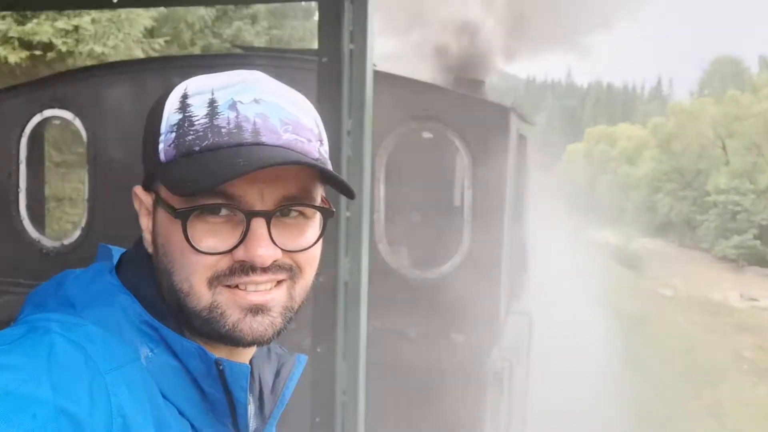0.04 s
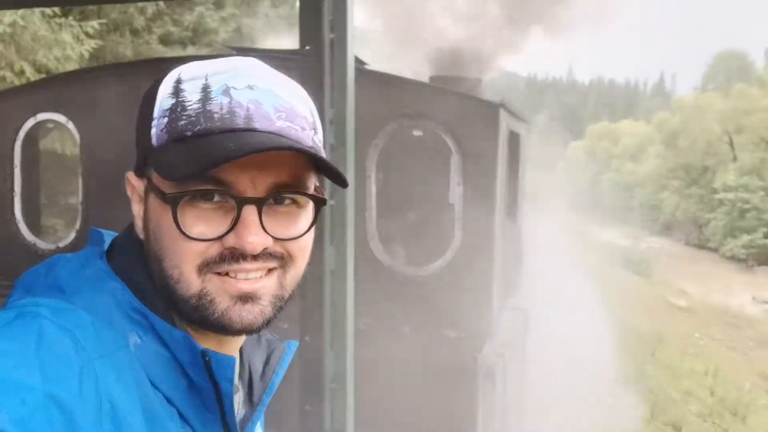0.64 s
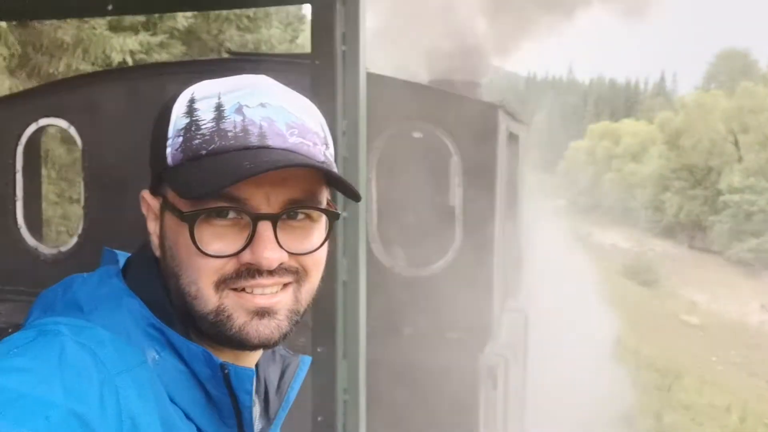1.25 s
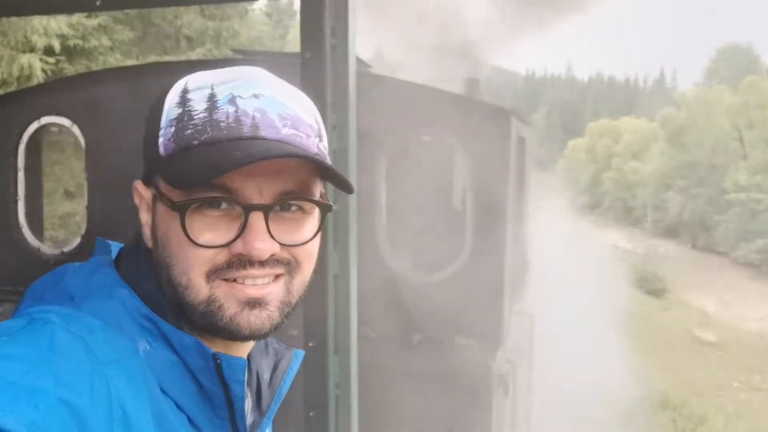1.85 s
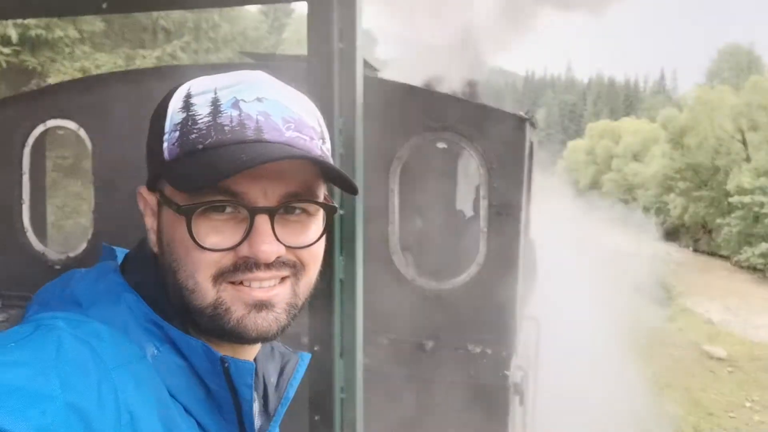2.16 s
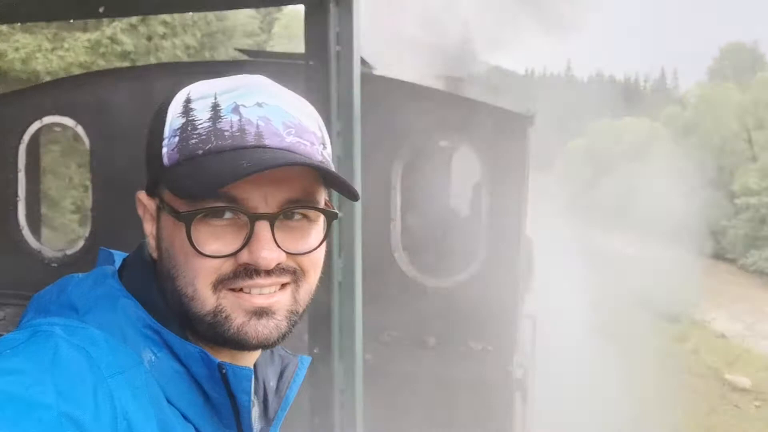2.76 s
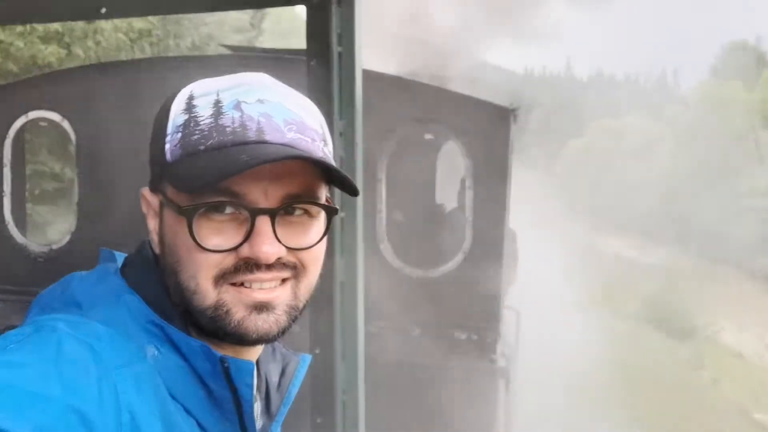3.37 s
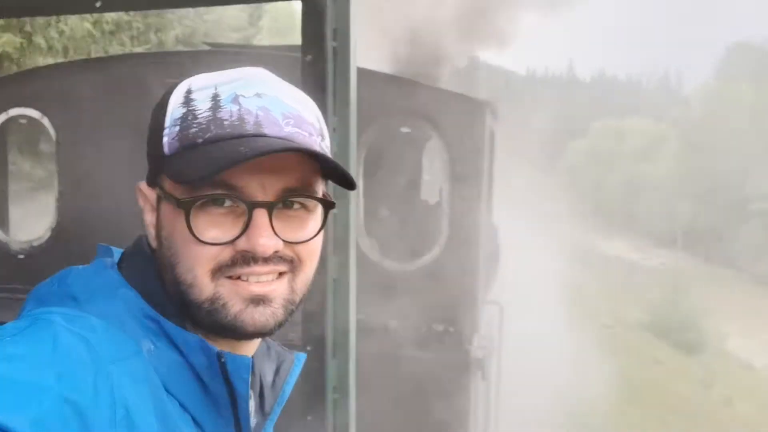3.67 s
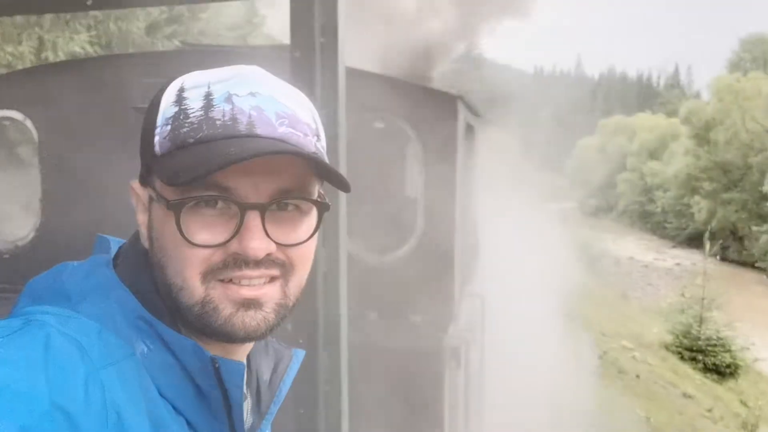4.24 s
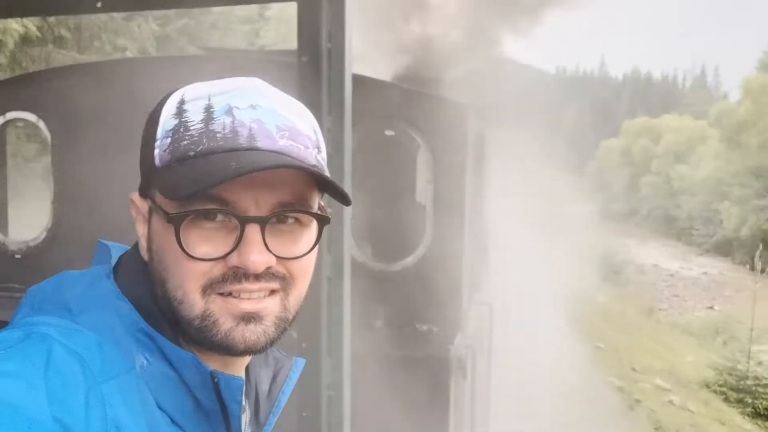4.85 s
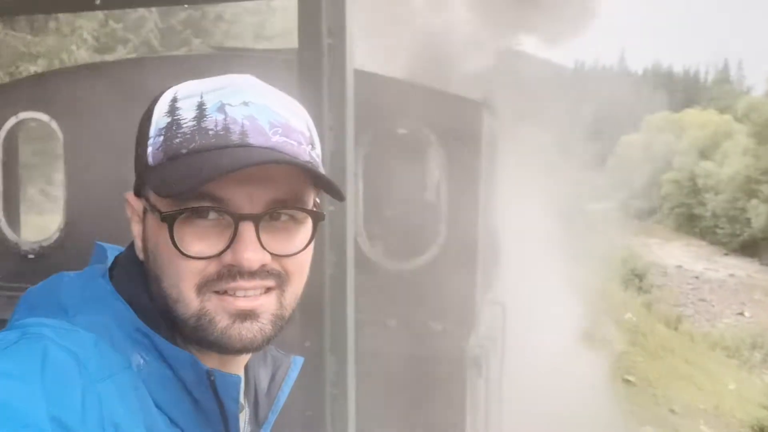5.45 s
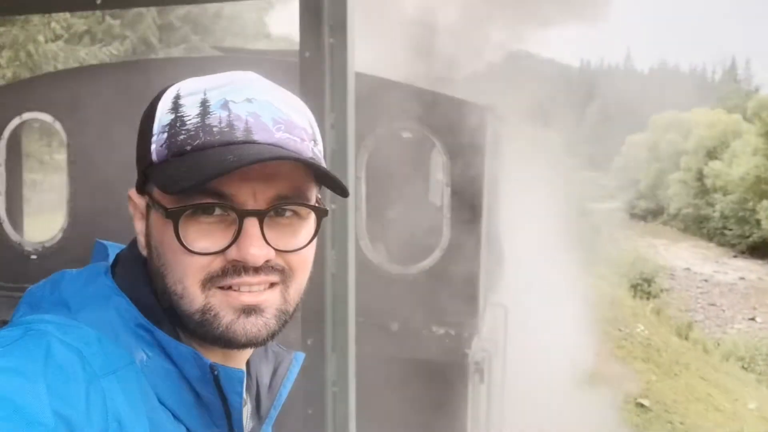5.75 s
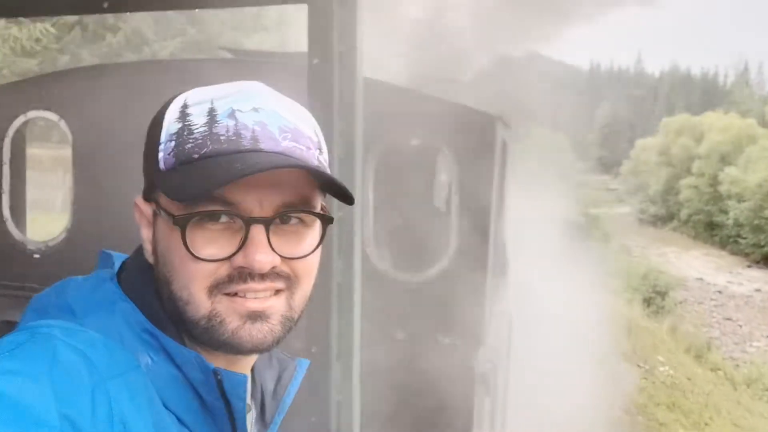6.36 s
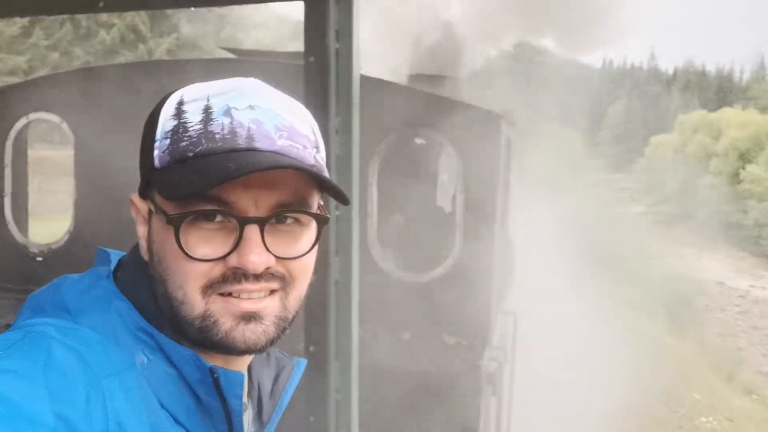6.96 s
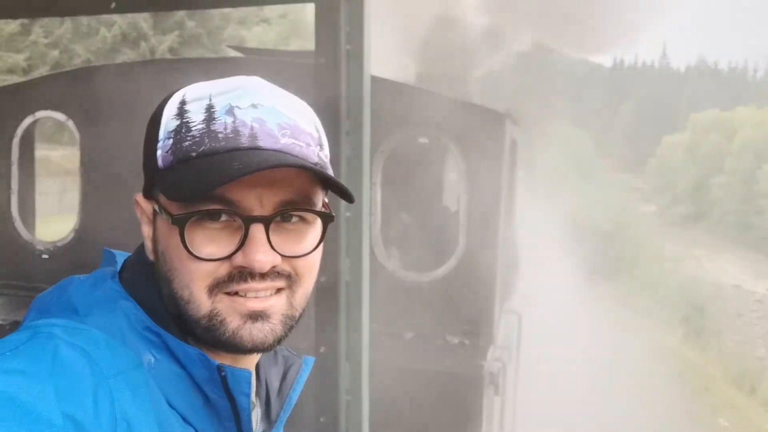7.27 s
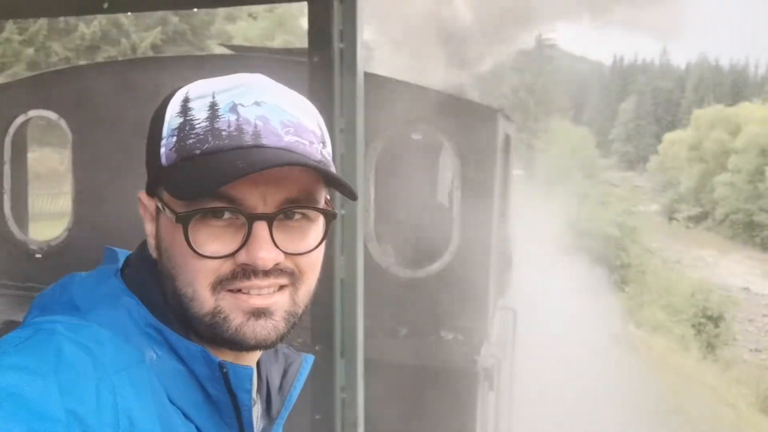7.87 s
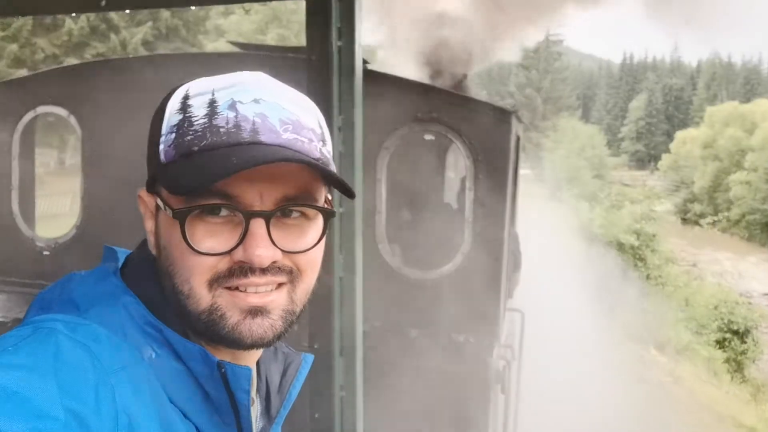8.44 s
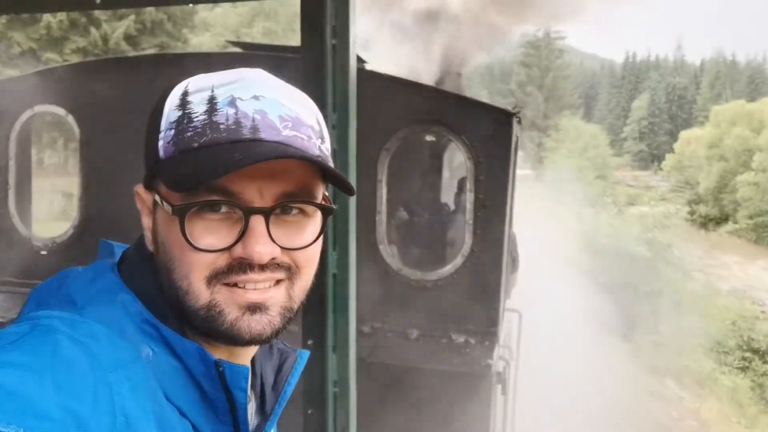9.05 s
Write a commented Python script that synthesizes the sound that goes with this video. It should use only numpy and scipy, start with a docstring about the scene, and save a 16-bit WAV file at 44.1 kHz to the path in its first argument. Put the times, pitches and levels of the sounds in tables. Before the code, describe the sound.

A small steam locomotive chuffs quickly and steadily close by, with hissing steam over the low rumble of wheels on rails.

```python
"""In an open carriage just behind the cab, as a small steam locomotive works along a valley.
Steam puffs from the chimney five and a half times a second. Each puff, or beat, roars, hisses
and makes the hollow cab boom. Underneath, the wheels rumble and ring on the rails,
a dull knock stands out now and then, and a little steam leaks all the time."""
import sys
import numpy as np
from scipy import signal
from scipy.fft import rfft, irfft, next_fast_len
from scipy.io import wavfile
from scipy.ndimage import uniform_filter1d

SR = 44100
rng = np.random.default_rng(int(sys.argv[2]) if len(sys.argv) > 2 else 0)


def generate_wav(signal):
    """Clip the signal to [-1, 1] and save it as 16-bit WAV at the path in sys.argv[1]."""
    frames = np.transpose(np.atleast_2d(signal))
    scaled = np.clip(frames, -1, 1) * 32767
    pcm = np.round(scaled).astype(np.int16)
    wavfile.write(sys.argv[1], SR, pcm)


N = 406161
TIME = np.arange(N) / SR
SIZE = next_fast_len(N, True)
HZ = np.fft.rfftfreq(SIZE, 1 / SR)

# How hard the engine works. Each row: time in seconds, effort in dB.
ENGINE_EFFORT = [(0.0, -2.3), (0.83, 0.15), (2.46, -3.5), (3.01, 0.6), (3.56, -1.5), (5.02, -0.3),
                 (5.38, 1), (5.57, 0.5), (6.12, 1), (8.51, 0.5), (8.88, 3), (9.21, 0.4)]


def gain_of(db):
    """Turns decibels into a number to multiply a sound by."""
    return 10 ** (np.asarray(db) / 20)


def over_time(points, seconds=TIME):
    """Joins (seconds, value) points with straight lines."""
    return np.interp(seconds, *np.transpose(points))


def over_pitch(points):
    """Joins (Hz, value) points with straight lines, on a scale of octaves."""
    hz, value = np.transpose(points)
    return np.interp(np.log(HZ + 1), np.log(hz + 1), value)


def tone(points):
    """The gain at each frequency, from (Hz, dB) points."""
    return gain_of(over_pitch(points))


def resonances(modes):
    """The gain at each frequency of something that rings at a few pitches."""
    return np.sqrt(sum(gain_of(db) ** 2 / (1 + ((HZ - hz) / width) ** 2) ** 3 for hz, width, db in modes))


def drift(rate_hz):
    """A random wobble, about 1 in size, that changes up to about the given rate."""
    size = 2 ** 14
    hz = np.fft.rfftfreq(size, TIME[-1] / size)
    wave = irfft(rfft(rng.standard_normal(size)) * np.exp(-(hz / rate_hz) ** 2), size)
    return np.interp(TIME, np.linspace(0, TIME[-1], size), wave / wave.std())


def swells(events):
    """One smooth rise and fall for each (middle in seconds, length in seconds, dB)."""
    return sum(gain_of(db) * np.exp(-np.square(2 * (TIME - s) / length)) for s, length, db in events)


def stereo_noise(shape):
    """Noise with the given tone, as it reaches the left and right microphones."""
    # How alike the two sides are. Each row: frequency in Hz, likeness from 0 to 1.
    likeness = [(30, 0.96), (130, 0.96), (210, 0.86), (300, 0.93), (700, 1), (950, 0.6), (1700, 1),
                (3000, 0.73), (5000, 0.64), (6000, 0.35), (7200, 0.36), (8000, .12)]
    # How far the left side lags. Each row: frequency in Hz, lag in radians.
    left_lag = [(30, -0.5), (1000, 0.53), (1500, 0.74), (2400, 2), (3300, 3), (4500, 3.5), (5500, 4.5),
                (7000, 9), (16000, 15.5)]
    common, own = rng.standard_normal((2, len(HZ))) + 1j * rng.standard_normal((2, len(HZ)))
    same = np.clip(over_pitch(likeness), 0, 1)
    left = common * np.exp(-1j * over_pitch(left_lag))
    right = same * common + np.sqrt(1 - same ** 2) * own
    return irfft(np.array([left, right]) * shape * np.sqrt(SIZE * SR) / 2, SIZE)[:, :N]


def steadied(sound, seconds, share):
    """Evens out the level: something kept ringing is steadier than plain noise."""
    power = uniform_filter1d((sound ** 2).mean(0), int(seconds * SR))
    power = uniform_filter1d(power, int(seconds * SR) // 2)
    return sound * (power.mean() / power) ** (share / 2)


def wall_echoes(sound, sway=0.0223):
    """Nearby walls add echoes whose delays shift as the carriage sways."""
    # Echoes off the cab and the roof. Each row: delay in seconds, strength as a fraction.
    echoes = [(.00198, 0.14), (.0043, 0.13), (.0071, .13), (.0116, 0.21)]
    out = sound.copy()
    for delay, strength in echoes:
        earlier = TIME - delay * (1 + sway * drift(0.9))
        out += strength * np.array([np.interp(earlier, TIME, side) for side in sound])
    return out


def engine_beats(count=51, first_s=.0322, gap_s=.181064, slowing_s=.0000746):
    """Four valves take turns, slowing very slightly. Gives each beat's start, strength and fade time."""
    # The uneven beats of one wheel turn. Each row: lateness in seconds, strength in dB, fade in seconds.
    valves = [(0.0048, 6.5, .17), (-0.00082, 7, 0.15), (-0.008, 7, 0.12), (0.0072, 9, 0.095)]
    k = np.arange(count)
    late, db, fade = np.array(valves)[k % len(valves)].T
    louder, longer = rng.uniform(-1, 1, (count, 2)).T
    start = first_s + gap_s * k + slowing_s * k * (k - 1) / 2 + late
    return np.transpose([start, db + .5 * louder, fade * np.exp(0.16 * longer)])


def puffing(beats, curve, follow, open_s, close_s, leak_db, leak_follow=0, accent=1):
    """Steam flow swells as a valve opens and fades as the cylinder empties; some leaks in between."""
    # follow and leak_follow set how much the beats and the leak respond to the level curve
    power = gain_of(leak_db + leak_follow * over_time(curve)) ** 2
    for start, strength_db, fade in beats:
        curve_db = over_time(curve, start + .07)  # at the middle of the beat
        span = slice(max(int(start * SR), 0), int(start * SR) + SR // 2)
        t = np.maximum(TIME[span] - start, 0)
        valve = np.sin(np.pi / 2 * np.minimum(t / open_s, 1)) / (1 + (t / close_s) ** 4)
        emptying = np.exp(-t / (fade * np.exp(0.15 * curve_db)))  # harder beats fade more slowly
        power[span] += (gain_of(accent * strength_db + follow * curve_db) * valve * emptying) ** 2
    return np.sqrt(power)


def leaking_steam(waver_db=1.2):
    """Steam leaks by the cylinders with a thin, steady hiss."""
    # The band of hiss. Each row: pitch in Hz, width in Hz, level in dB.
    leak_band = [(4000, 1200, -70.5)]
    return stereo_noise(resonances(leak_band)) * gain_of(waver_db * drift(3))


def dull_knocks(pitch_hz=385, rise_s=0.0067):
    """Short, dull knocks stand out from the boom now and then."""
    # The knocks. Each row: start in seconds, relative level in dB.
    knocks = [(0.574, -14), (1.752, -7), (2.982, -7), (3.519, -7), (3.728, -9.5), (3.966, -10),
              (4.276, -6.5), (5.405, -11), (5.562, -7), (6.695, -4), (7.408, -1.5), (7.527, -9.5),
              (7.623, -7.5), (8.362, -7.5), (8.479, -6.5), (8.754, -8.5), (9.184, -7)]
    out, t = np.zeros(N), TIME[:SR // 10]
    blow = (t / rise_s * np.exp(1 - t / rise_s)) ** 2
    for (start, db), (detune, phase) in zip(knocks, rng.uniform(-0.78, 1, (len(knocks), 2))):
        note = np.sin(2 * np.pi * pitch_hz * (1 + 0.038 * detune) * t + np.pi * phase)
        knock = gain_of(db - 2) * blow * note
        part = out[round(start * SR):][:len(t)]
        part += knock[:len(part)]
    return out


def track_rumble(jolt_s=0.048):
    """Rolling shakes the carriage; uneven track jolts only the deepest part of the rumble."""
    # The tone of wheels on track. Each row: frequency in Hz, level in dB.
    rumble = [(10, -75), (22, -71), (35, -61), (48, -48.5), (57, -46), (75, -46), (100, -50.5),
              (150, -54.5), (200, -53.5), (330, -48.5), (520, -60), (800, -65.5), (1500, -74), (4000, -94)]
    # Bumps in the track. Each row: time in seconds, relative strength in dB.
    jolts = [(1.31, 10), (1.80, 5), (1.99, 7), (2.25, 3), (2.38, 14), (2.58, 4), (2.9, 6), (3.31, 8),
             (4.74, 5), (4.94, 10), (5.03, 7), (5.48, 5), (5.76, 2.5), (5.93, 6), (6.68, 8), (7.45, 7),
             (8.02, 9), (8.69, 2), (9.14, 3)]
    deep_share = 1 / (1 + (HZ / 85) ** 4)
    deep = steadied(stereo_noise(tone(rumble) * np.sqrt(deep_share)), seconds=0.11, share=.7)
    deep *= gain_of(-0.5 + drift(9)) + swells((s, jolt_s, db - 3) for s, db in jolts)
    return deep + stereo_noise(tone(rumble) * np.sqrt(1 - deep_share))


def floor_drone(pitch_hz=56, quiet_db=-44):
    """Rolling sets the carriage floor humming on a low, wavering note."""
    # Louder spells. Each row: middle in seconds, length in seconds, level in dB.
    spells = [(2.0, 0.67, -26), (3.35, 0.28, -30), (5.6, .5, -29)]
    cycles = np.cumsum(pitch_hz * (1 + 0.038 * drift(5.7))) / SR
    level = (gain_of(quiet_db) + swells(spells)) * gain_of(1.3 * drift(8))
    return np.sqrt(2) * np.sin(2 * np.pi * cycles) * level


def wheel_ring(beats):
    """The wheels rub and ring, more so as each piston stroke tugs them against the rail."""
    # The notes of the wheel discs. Each row: pitch in Hz, width in Hz, level in dB.
    wheel_notes = [(1089, 212, -51.5), (1200, 200, -54)]
    # Rubbing of the wheel rims. Each row: time in seconds, change in ringing in dB.
    rubbing = [(0, 1.5), (1.05, 1.5), (2.1, 5), (2.8, 0), (3.8, 5), (4.2, 2), (4.7, 4), (7.1, -3.5),
               (7.65, 1), (9.21, -8)]
    noise = rng.standard_normal((2, SIZE))
    ring = irfft(rfft(noise) * resonances(wheel_notes), SIZE)[:, :N] * np.sqrt(SR / 2)
    ring = 0.67 * ring + 0.24 * ring[::-1]  # it comes from all round, so each side hears mostly its own
    tug = puffing(beats, ENGINE_EFFORT, follow=0.24, open_s=0.094, close_s=0.22, leak_db=-16) ** 0.45
    return ring * tug * gain_of(over_time(rubbing) + 1.66 * drift(20))


def cab_boom(beats, swell_s=0.084):
    """The beats keep the air and sheet steel of the cab booming, each with a low thump."""
    # The cab's booming and thumping notes. Each row: pitch in Hz, width in Hz, level in dB.
    boom_notes = [(274, 14.6, -49.5), (349, 37, -42.5), (383.7, 22.5, -39.5), (411.8, 22.5, -43.5),
                  (461, 38, -53.5), (594, 54, -51.5)]
    thump_notes = [(117.7, 20.6, -38), (148, 30, -42.5)]
    # When the thump swells. Each row: time in seconds, added thump in dB relative to the usual one.
    louder_thumps = [(.26, -9), (1.01, -5), (1.92, -5), (2.28, -1), (3.51, 0), (3.74, -4), (4.27, -2),
                     (7.03, -8), (7.67, -7), (7.97, -6), (9.11, -9)]
    boom = steadied(stereo_noise(resonances(boom_notes)), seconds=0.092, share=0.96)
    boom *= gain_of(1.12 + drift(5.5))
    boom *= puffing(beats, ENGINE_EFFORT, follow=.11, open_s=0.091, close_s=0.23,
                    leak_db=-3, leak_follow=0.35, accent=0.55)
    thump = steadied(stereo_noise(resonances(thump_notes)), seconds=0.16, share=0.72) * gain_of(1.86)
    thump *= puffing(beats, ENGINE_EFFORT, follow=-0.33, open_s=0.091, close_s=.2,
                     leak_db=-4.5, accent=0.53)
    return boom + thump * (1 + swells((s, swell_s, db) for s, db in louder_thumps))


def chimney_hiss(beats, flutter):
    """The steam jet hisses with each beat; its smallest swirls add a fizz with a flicker of its own."""
    # The tone of the hiss. Each row: frequency in Hz, level in dB.
    hiss_tone = [(1000, -84), (2500, -72), (3500, -66), (4300, -65), (6000, -65), (9000, -71), (12000, -76),
                 (16000, -81)]
    # How all the hiss, and the fizz alone, rise and fall. Each row: time in seconds, level in dB.
    steam_level = [(0.0, 1.2), (0.46, -1), (0.83, 3), (1.19, -0.3), (2.64, -2), (2.83, -1.1), (4.29, -1.5),
                   (4.47, -0.4), (5.02, -0.4), (5.2, 1.7), (5.57, 1.5), (5.93, 3.5), (6.12, 0.2),
                   (6.48, 0.0), (7.04, 1.5), (7.96, 0.0), (8.14, 2), (9.21, 3.5)]
    fizz_level = [(0, 1), (.65, -1.5), (1.5, -1.2), (1.8, 1.5), (2.4, -3), (2.8, 3), (3.15, 0), (6.3, 0.6),
                  (7.35, -0.5), (7.6, 0.5), (9.21, -1.5)]
    # Spurts of steam. Each row: middle in seconds, length in seconds, level in dB relative to the hiss.
    spurts = [(.46, 0.083, -11), (.66, 0.11, -9), (1.38, 0.14, -8), (2.09, 0.074, -19), (2.28, .08, -13.5),
              (4.7, .2, -15), (7.19, 0.053, -14), (7.45, 0.22, -7.5), (8.14, 0.079, -7)]
    fizz_share = 1 / (1 + (7000 / (HZ + 1)) ** 8)
    hiss = stereo_noise(tone(hiss_tone) * np.sqrt(1 - fizz_share))
    hiss *= gain_of(-0.66 + .5 * flutter + 0.8 * drift(55)) * (1 + swells(spurts))
    hiss *= puffing(beats, steam_level, follow=.65, open_s=0.077, close_s=0.22,
                    leak_db=-7, leak_follow=0.61)
    fizz = stereo_noise(tone(hiss_tone) * np.sqrt(fizz_share))
    fizz *= gain_of(over_time(fizz_level) + .5 * flutter + 0.56 * drift(90))
    fizz *= puffing(beats, steam_level, follow=0.34, open_s=0.07, close_s=0.22,
                    leak_db=-7, leak_follow=0.47)
    return hiss, fizz


def chimney_roar(beats, flutter):
    """The steam jet roars with each beat, makes the pipe ring and barks when the engine works hard."""
    # The tone of the jet. Each row: frequency in Hz, level in dB.
    roar_tone = [(150, -76), (300, -60.5), (600, -59.5), (900, -61), (1300, -59), (1700, -56),
                 (2100, -56.5), (2700, -61), (3500, -67), (6000, -80), (16000, -105)]
    # The pipe's hollow notes and the bark. Each row: pitch in Hz, width in Hz, level in dB.
    pipe_notes = [(515, 69, -59), (629.5, 40, -52), (647, 25, -54), (754, 85, -59.5)]
    bark_notes = [(1660, 240, -58.5), (2060, 180, -65.5), (2720, 87, -62.5)]
    # How strongly the pipe rings. Each row: time in seconds, change in dB.
    ring_level = [(0, 11), (.55, -2.5), (2.1, -2.5), (3, -7), (3.6, -2), (5.4, -2), (5.8, 1.5), (6.9, 3),
                  (7.8, 1.5), (8.7, 3.5), (9.21, 3.5)]
    roar = stereo_noise(tone(roar_tone)) * gain_of(0.77 * flutter + 0.95 * drift(120))
    ring = stereo_noise(resonances(pipe_notes)) * gain_of(over_time(ring_level) + 1.2 * drift(7.1))
    bark = stereo_noise(resonances(bark_notes))
    bark *= gain_of(2.7 * over_time(ENGINE_EFFORT) + 2.3 * drift(7.3))
    flow = puffing(beats, ENGINE_EFFORT, follow=.2, open_s=0.071, close_s=0.19, leak_db=-5)
    return (roar + ring + bark) * flow


def scene():
    """The engine and the carriage together, sharing one set of beats."""
    beats = engine_beats()
    flutter = drift(53)  # the jet flutters as its swirls break up
    roar = chimney_roar(beats, flutter)
    hiss, fizz = chimney_hiss(beats, flutter)
    engine = wall_echoes(roar + hiss) + fizz + leaking_steam() + cab_boom(beats)
    return engine + track_rumble() + floor_drone() + wheel_ring(beats) + dull_knocks()


def record(dry, ceiling=.93, top_hz=15800):
    """Each microphone colours the sound; the tallest peaks are rounded and the highest treble is cut."""
    # The tone of each microphone. Each row: frequency in Hz, boost or cut in dB.
    left_tone = [(200, -1.5), (380, 1.25), (800, 1.5), (1300, -0.5), (1700, 3), (2200, 4), (3300, 1),
                 (4300, 1), (5900, 7.5), (6450, 4.5), (8000, -15), (9900, -4), (11000, -15), (12500, -2.5)]
    right_tone = [(200, -2.5), (380, 1.66), (800, 1.5), (1300, -5), (1700, -5.5), (2200, -4.5),
                  (3300, -0.5), (4300, -0.2), (4800, -4.5), (5200, -3), (5600, -9.5), (7000, -4.5),
                  (9000, 1.5), (15000, 2)]
    coloured = irfft(rfft(dry, SIZE) * np.array([tone(left_tone), tone(right_tone)]), SIZE)[:, :N]
    rounded = coloured / (1 + (coloured / ceiling) ** 6) ** (1 / 6)
    low_pass = signal.firwin(1023, top_hz, window=("kaiser", 9), fs=SR)
    return signal.oaconvolve(rounded, low_pass[None], "same")


dry = scene()
out = record(dry)
generate_wav(out)
```